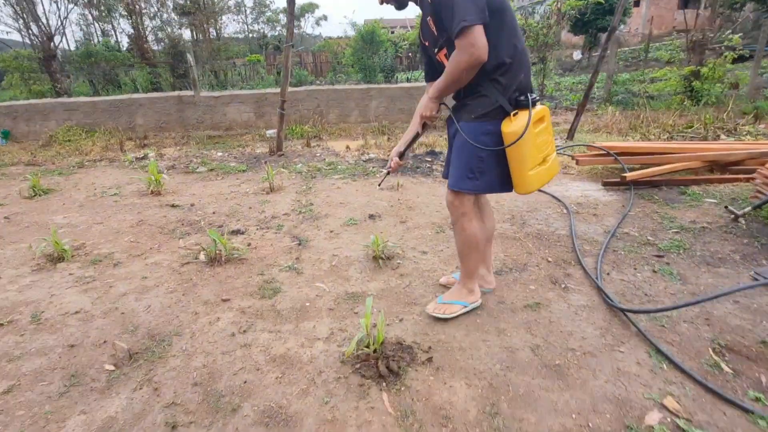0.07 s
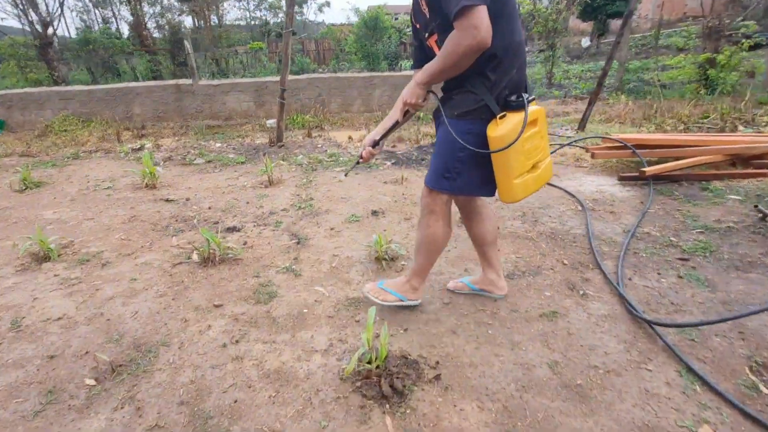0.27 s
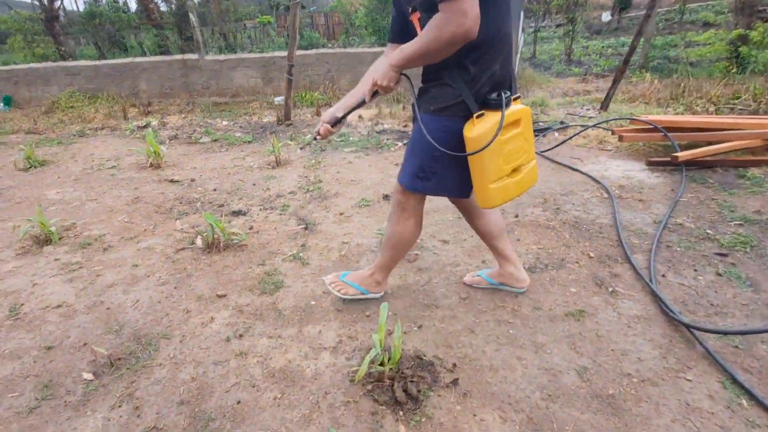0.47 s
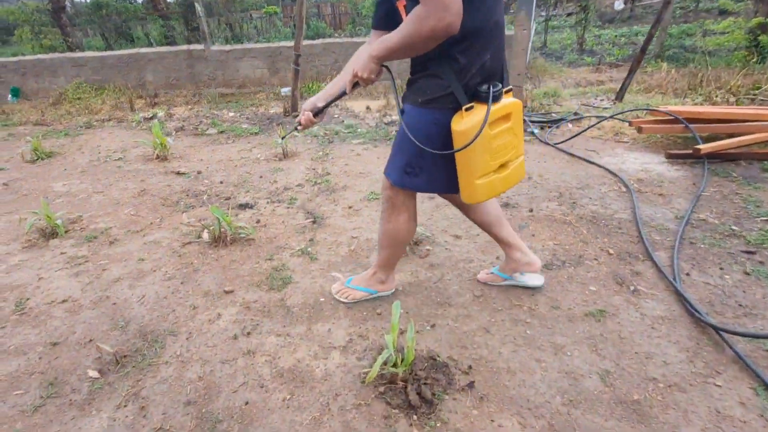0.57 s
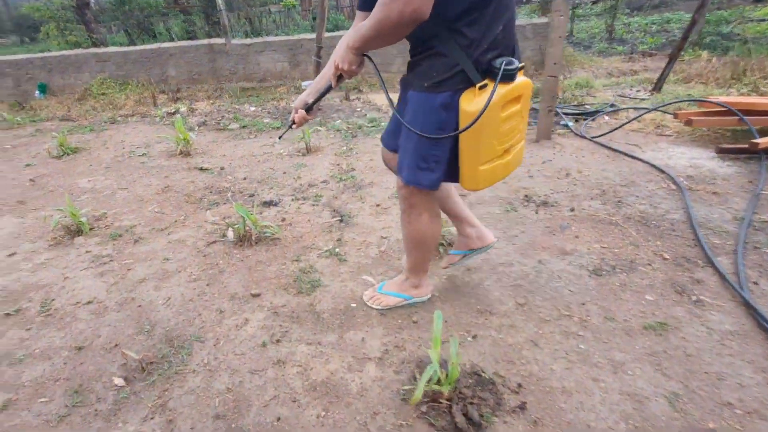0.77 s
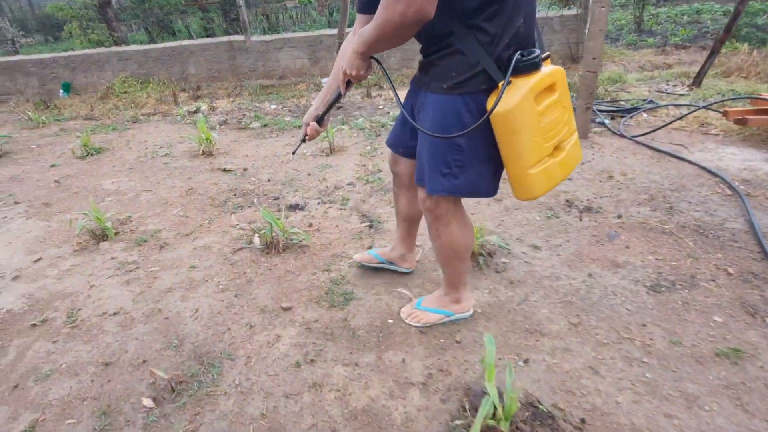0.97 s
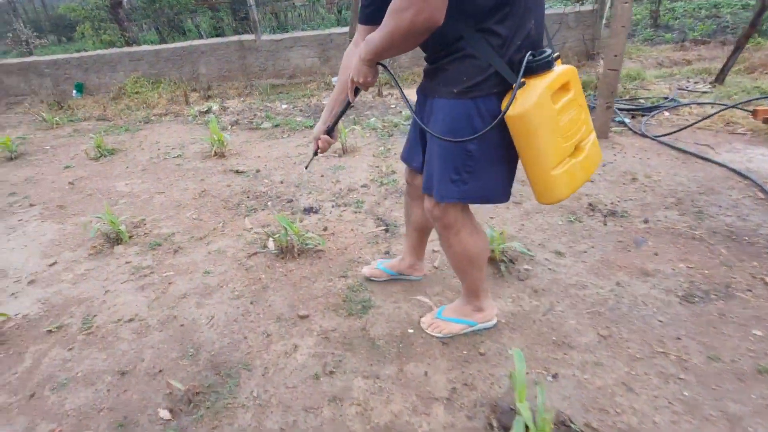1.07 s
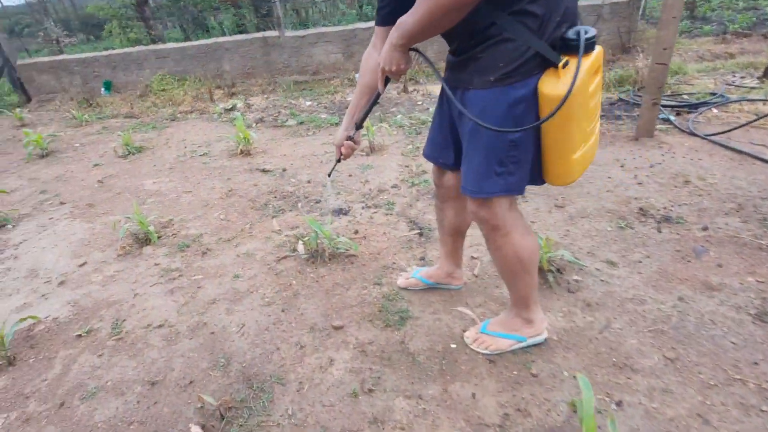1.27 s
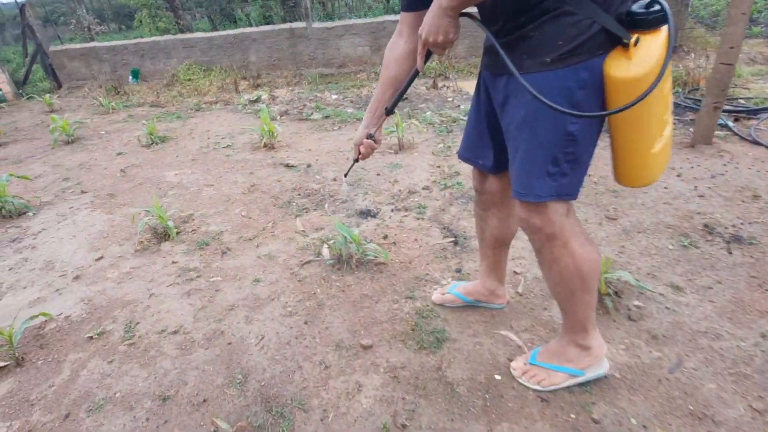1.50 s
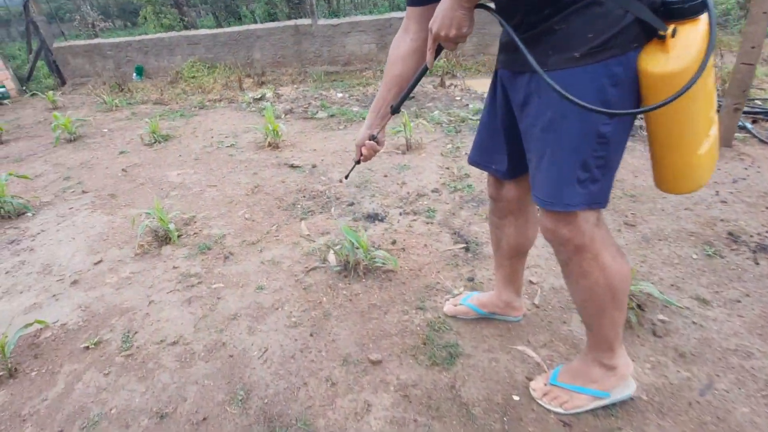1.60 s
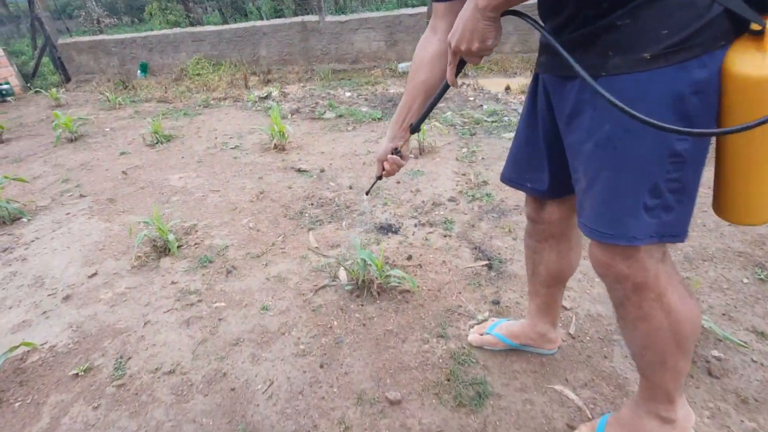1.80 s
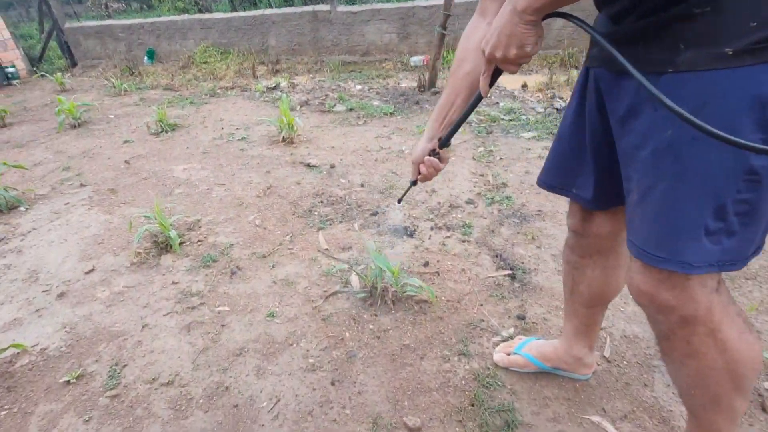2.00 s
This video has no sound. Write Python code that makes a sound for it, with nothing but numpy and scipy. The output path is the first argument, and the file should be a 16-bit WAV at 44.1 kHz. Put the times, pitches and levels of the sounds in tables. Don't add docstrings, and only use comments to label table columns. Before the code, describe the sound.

Pressure sprayer hisses fine mist onto plants in two squeezes, after sandals crunch over gritty soil

```python
import sys
import numpy as np
from scipy import signal
from scipy.fft import rfft, irfft, next_fast_len
from scipy.io import wavfile
from scipy.ndimage import uniform_filter1d, map_coordinates

SR = 44100
rng = np.random.default_rng(int(sys.argv[2]) if len(sys.argv) > 2 else 0)


def transcribe(u):
    v = np.clip(np.atleast_2d(u).T, -1, 1)
    q = np.round(v * 32767).astype(np.int16)
    wavfile.write(sys.argv[1], SR, q)


def ratio_of_db(decibels):
    return 10 ** (np.asarray(decibels, float) / 20)


N = 90404


def unit(x):
    return x / np.sqrt(np.mean(x ** 2) + 1e-20)


def along(points, hz):
    f, v = np.transpose(points)
    return np.interp(np.log(hz + 1), np.log(f + 1), v)


def wobble(rate):
    knots = rng.standard_normal(int(N * rate / SR) + 4)
    return map_coordinates(knots, [np.arange(N) * rate / SR])


def filtered(x, response):
    m = next_fast_len(N + 8192)
    return irfft(rfft(x, m) * response(np.fft.rfftfreq(m, 1 / SR)), m)[..., :N]


def spread(pair, spectrum, alike):
    def mid_side(hz):
        turn = np.arccos(np.clip(along(alike, hz), -1, 1)) / 2
        return ratio_of_db(along(spectrum, hz)) * [np.cos(turn), np.sin(turn)]

    mid, side = filtered(pair, mid_side)
    return unit(np.array([mid + side, mid - side]))


def patchy(depth_db):
    z = signal.stft(rng.standard_normal((2, N)), nperseg=256)[2]
    field = uniform_filter1d(rng.standard_normal(z.shape[1:]), 5, 0)
    field = uniform_filter1d(field, 10, 1)
    return signal.istft(z * ratio_of_db(depth_db * unit(field)), nperseg=256)[1][:, :N]


def impacts(per_s, spread_db, wash):
    hits = rng.random(N) < per_s / SR
    size = hits * ratio_of_db(spread_db * np.minimum(rng.exponential(size=N), 3))
    burst = signal.lfilter([1], [1, -.93], size)
    return unit(unit(burst) + wash) * patchy(depth_db=1.5)


def leftward(pair, lead_s):
    return filtered(pair, lambda hz: np.exp(1j * np.pi * hz * lead_s * np.array([[1], [-1]])))


def countryside():
    # pitch_hz [Hz], level_db [dB per Hz]
    air_colour = [(150, -7), (220, -16.5), (600, -4), (1000, -21.5), (1600, -4), (4000, -3.5), (7500, -7),
                  (16000, -16.5)]
    # pitch_hz [Hz], level_db [dB per Hz]
    hum_colour = [(33, -50), (45, -15), (55, 0.5), (115, -0.5), (200, -14.5), (300, -6.5), (400, -6.5)]
    # pitch_hz [Hz], left_right_likeness [0 to 1]
    far_width = [(60, 0.83), (1000, 0.22), (8000, 0.054)]
    # start_s [s], level_db [dB]
    breeze = [(0, 1.5), (.1, -1.5), (.33, 1.5), (.4, -1.5), (.49, -1.5), (.52, 2), (1.6, -1.5), (1.72, 1),
              (2.05, 4)]
    air_db, hum_db = -61.5, -70
    gust_db = np.interp(np.arange(N) / SR, *np.transpose(breeze)) + 0.31 * wobble(8.7)
    air = ratio_of_db(air_db + gust_db) * spread(patchy(depth_db=3.5), air_colour, far_width)
    hum = spread(patchy(depth_db=2), hum_colour + [(500, -61)], far_width)
    return air + ratio_of_db(hum_db + 0.66 * wobble(7.1)) * hum


def birds():
    # start_s [s], length_s [s], from_hz [Hz], to_hz [Hz], level_db [dB]
    chirps = [(.405, .055, 6950, 7100, -70), (.415, .04, 7000, 7800, -65), (.43, .035, 7150, 7950, -62),
              (.448, .04, 7350, 7950, -62), (.495, .03, 7600, 7700, -73), (.620, .012, 5450, 5100, -65),
              (.618, .035, 4950, 4200, -72), (.645, .026, 4250, 3900, -66), (.62, .035, 6650, 6700, -70),
              (.632, .025, 7200, 7550, -71), (.66, .014, 7300, 7700, -70)]
    echo_db, echo_t60 = -4, 0.21
    out = np.zeros(N + SR)
    waver = 1 + .017 * wobble(400)
    for s, d, from_hz, to_hz, db in chirps:
        start = round(s * SR)
        u = np.arange(round(d * SR)) / (d * SR)
        hz = (from_hz + (to_hz - from_hz) * u ** 0.83) * waver[start:][:len(u)]
        whistle = np.sin(2 * np.pi * np.cumsum(hz) / SR)
        out[start:][:len(u)] += ratio_of_db(db + 5) * np.sin(np.pi * u) * whistle
    tail = rng.standard_normal((2, SR // 5)) * ratio_of_db(-60 * np.arange(SR // 5) / SR / echo_t60)
    echo = signal.fftconvolve(out[None], tail / np.linalg.norm(tail[0]), axes=1)[:, :N]
    flicker_db = 3.5 * np.array([wobble(250), wobble(250)])
    return out[:N] * ratio_of_db(flicker_db) + ratio_of_db(echo_db) * echo


def thuds():
    # start_s [s], length_s [s], level_db [dB], pitch_hz [Hz]
    footfalls = [
        (.06, .08, -62, 390),
        (.697, .025, -61, 400),
        (1.05, .1, -67, 260),
        (1.197, .025, -57, 330),
        (1.305, .03, -55, 330),
        (1.335, .025, -55, 500),
        (1.762, .03, -54, 380),
        (1.79, .26, -58, 330),
    ]
    t, out = np.arange(N) / SR, 0
    for s, d, db, pitch_hz in footfalls:
        push = np.interp(t, [s, s + 0.41 * d, s + d], [0, 1, 0])
        band = filtered(rng.standard_normal(N),
                        lambda hz: np.exp(-(np.log((hz + 1) / pitch_hz) / 0.36) ** 2))
        out = out + ratio_of_db(db) * push * unit(band)
    return out


def sandals():
    # start_s [s], length_s [s], level_db [dB], grind_hz [Hz]
    scuffs = [(0.07, 0.08, -72, 4500), (0.094, 0.039, -51, 5500), (0.1, 0.046, -68, 2010),
              (0.189, 0.067, -55.5, 5440), (0.284, 0.02, -59, 3500), (0.507, 0.054, -54, 2280),
              (0.569, 0.077, -54.5, 1840), (0.703, 0.26, -58.5, 4470), (0.805, 0.038, -52.5, 1600),
              (0.826, 0.039, -49.5, 1560), (0.885, 0.13, -55, 1390), (1.046, 0.21, -54.5, 2000)]
    # pitch_hz [Hz], level_db [dB per Hz]
    grit_colour = [(200, -43), (700, -6), (1800, -2.5), (3500, -7.5), (7000, -6), (16000, -20)]
    # pitch_hz [Hz], left_right_likeness [0 to 1]
    underfoot = [(300, 0.35), (1500, 0.16), (5000, 0.13), (15000, 0.062)]
    rise = .2
    grind_db, grind_octaves = 9, 0.8
    t, out = np.arange(N) / SR, 0
    grit = spread(impacts(per_s=3500, spread_db=2, wash=0.3), grit_colour, underfoot)
    grit = ratio_of_db(1.9 * wobble(59.8)) * grit
    for s, d, db, grind_hz in scuffs:
        def grind(hz):
            octaves = np.log2((hz + 1) / grind_hz)
            return ratio_of_db(grind_db * (np.exp(-(octaves / grind_octaves) ** 2) - 0.84))

        press = np.interp(t, [s, s + rise * d, s + d, s + 2.28 * d], [0.035, 1.0, 0.54, 0.043])
        out = out + filtered(ratio_of_db(db) * press * grit, grind)
    return out


def ticks():
    # start_s [s], peak_db [dB], pitch_hz [Hz], snap_db [dB of the bright snap over the ring]
    cracks = [(0.091, -42, 2800, -10), (0.108, -47, 2160, -14), (0.131, -45, 2150, -22),
              (0.201, -46, 2500, -14), (0.267, -44, 2600, -12), (0.288, -46, 2200, -11),
              (0.293, -47, 2000, -8), (0.307, -48, 1300, -16), (0.336, -51, 1300, -16),
              (0.381, -53, 2000, -14), (0.388, -54, 1700, -18), (0.437, -52, 1400, -14),
              (0.497, -48, 5200, -10), (0.510, -49, 2220, -18), (0.517, -45, 2360, -16),
              (0.526, -46, 2000, -14), (0.533, -47, 2800, -14), (0.559, -47, 1500, -14),
              (0.589, -39.5, 1710, -12), (0.595, -47, 2000, -12), (0.699, -39.5, 1450, -16),
              (0.737, -44, 1380, -8), (0.77, -39, 2050, -13.5), (0.775, -48, 1700, -18),
              (0.802, -39, 1400, -16), (0.826, -38.5, 1000, -8), (0.832, -41, 1320, -20),
              (0.836, -40, 1590, -20), (0.86, -41, 1730, -12), (0.948, -43, 2130, -14),
              (0.955, -49, 2000, -18), (1.0005, -38.5, 1880, -22), (1.007, -49, 1300, -22),
              (1.012, -50, 1200, -22), (1.055, -46, 1200, -12), (1.059, -43, 2100, -14),
              (1.078, -41, 2200, -13), (1.099, -45, 1500, -20), (1.136, -43, 1540, -20),
              (1.141, -40, 1550, -20), (1.2, -33, 1700, -24), (1.607, -38, 1400, -16),
              (1.6375, -45, 2800, -12), (1.6415, -38, 1600, -14), (1.6665, -47, 1200, -20),
              (1.682, -47, 1000, -16), (1.7095, -42, 3000, -6)]
    ring_t60, snap_t60, spike_s, late_s = 0.0036, 0.0014, 50e-6, 0.0015
    all_db, snap_up_db, spike_db = 1, 4.5, 11
    rebound_s, rebound = .0008, 0.45
    low_hz, top_hz = 350, 9000
    out, t = np.zeros((2, N + SR)), np.arange(SR // 40) / SR
    for s, db, hz, snap_db in cracks:
        noise = rng.standard_normal(len(t)) + .5 * rng.standard_normal((2, len(t)))
        snap = ratio_of_db(snap_up_db + snap_db - 60 * t / snap_t60) * noise
        spike = ratio_of_db(spike_db + snap_db / 2) * np.exp(-t / spike_s)
        ring = ratio_of_db(-60 * t / ring_t60) * np.cos(2 * np.pi * hz * t - .6)
        crack = snap + spike + ring
        again = np.roll(crack, round(rebound_s * SR * rng.uniform(0.57, 1.3)), axis=1)
        out[:, round((s + late_s) * SR):][:, :len(t)] += ratio_of_db(db + all_db) * (crack + rebound * again)

    def light(hz):
        return (1j * hz / (low_hz + 1j * hz)) ** 2 / (1 + 1j * hz / top_hz)

    return filtered(out[:, :N], light)


def drips():
    # start_s [s], peak_db [dB], pitch_hz [Hz], t60_s [s]
    leaf_rings = [
        (1.609, -44, 600, .014),
        (1.648, -46, 1050, .012),
        (1.657, -41, 2050, .012),
        (1.668, -48, 1900, .012),
        (1.680, -50, 2100, .012),
        (1.688, -50, 2100, .016),
        (1.715, -56, 1600, .01),
        (1.632, -46, 1700, .01),
    ]
    out, t = np.zeros(N + SR), np.arange(SR // 40) / SR
    soft_edge = 1 - np.exp(-t / .0012)
    for s, db, hz, t60 in leaf_rings:
        ring = ratio_of_db(db + 6 - 60 * t / t60) * np.sin(2 * np.pi * hz * t)
        out[round(s * SR):][:len(t)] += soft_edge * ring
    return out[:N]


def hollow(x):
    # start_s [s], high_share [0 low ring, 1 high ring]
    slide = [(1.15, 0.21), (1.32, 1), (1.42, .2), (1.48, 0), (1.75, 0.2), (1.85, 0.13), (1.95, 1),
             (2.05, 0.43)]
    ring_db, width = 4.5, 0.23

    def ringing(ring_hz):
        return filtered(x, lambda hz: ratio_of_db(ring_db * np.exp(-(np.log((hz + 1) / ring_hz) / width) ** 2)))

    high = np.clip(np.interp(np.arange(N) / SR, *np.transpose(slide)), 0, 1)
    return (1 - high) * ringing(1630) + high * ringing(2170)


def sprayer():
    # start_s [s], hiss_db [dB], fine_db [dB patter over the hiss], heavy_db [dB drops over it]
    pulls = [
        [(1.05, -71, 10, 2), (1.06, -61.5, 10.5, -6), (1.075, -53.5, 6.5, -11), (1.1, -60, -5, -7),
         (1.125, -55, -7, -5), (1.13, -80, 0, 0)],
        [(1.11, -66, -2, -2), (1.138, -47.5, -0.5, -9.5), (1.205, -42, -3.5, -2.5), (1.3, -42, 0.5, 0.5),
         (1.4, -40.5, 3.5, -3.5), (1.5, -44, 1.5, 0), (1.565, -46, 3, -3), (1.605, -56.5, 8, 0.5),
         (1.715, -85, 22, 16.5)],
        [(1.732, -81, -6, 9), (1.743, -49, 3, -12), (1.775, -44.5, 6, 1.5), (1.85, -40.5, 6.5, -1.5),
         (1.95, -37.5, 6, -6), (2.05, -37, 4.5, -4.5)],
    ]
    # pitch_hz [Hz], level_db [dB per Hz]
    jet_colour = [(1500, -17), (4000, -33), (8000, -6), (12000, 0), (16000, -1)]
    # pitch_hz [Hz], level_db [dB per Hz]
    patter_colour = [(500, -45), (1200, -8), (1900, -3), (2600, -2.5), (4500, -2), (6000, 0.5),
                     (8300, -5.5), (16000, -11)]
    # pitch_hz [Hz], level_db [dB per Hz]
    heavy_colour = [(150, -33), (300, -18), (450, -17), (620, -2), (1100, 0), (1900, 1), (2600, -10.5),
                    (5000, -12)]
    # pitch_hz [Hz], left_right_likeness [0 to 1]
    near_width = [(300, .85), (1400, .8), (3000, .6), (5500, .6), (7000, .4), (15000, .5)]
    leads_s = [60e-6, 40e-6, 2e-6]
    sizzles_db, sizzle_hz = [-3, 3.5, -2.5], 8850
    t, out = np.arange(N) / SR, 0
    jet = spread(patchy(depth_db=-0.5), jet_colour, near_width)
    patter = hollow(spread(impacts(per_s=9800, spread_db=-0.5, wash=3.1), patter_colour, near_width))
    heavy = spread(impacts(per_s=1500, spread_db=4, wash=1.9), heavy_colour, near_width)
    hiss_flutter, fine_flutter, heavy_flutter = .4 * wobble(30), .6 * wobble(40), wobble(40)
    for pull, lead_s, sizzle_db in zip(pulls, leads_s, sizzles_db):
        s, hiss_db, fine_db, heavy_db = np.transpose(pull)
        sizzling = filtered(patter, lambda hz: ratio_of_db(sizzle_db * np.exp(-(hz / sizzle_hz - 1) ** 2 / 0.071)))
        fine = ratio_of_db(np.interp(t, s, fine_db) + fine_flutter) * sizzling
        drops = ratio_of_db(np.interp(t, s, heavy_db) + heavy_flutter) * heavy
        level = ratio_of_db(np.interp(t, s, hiss_db, -120, -120) + hiss_flutter)
        out = out + leftward(level * (jet + fine + drops), lead_s)
    return out


def scene():
    # pitch_hz [Hz], left_over_right_db [dB]
    lean = [(300, 2.6), (1500, -.6), (3500, 3.2), (5500, -1), (7500, 4), (8900, 1), (10500, 4.5),
            (15500, -2)]
    ground_lead_s = 290e-6
    feet = leftward(sandals() + thuds(), ground_lead_s) + leftward(ticks() + drips(), 60e-6)
    background = birds() + leftward(countryside(), ground_lead_s)
    return filtered(sprayer() + feet + background,
                    lambda hz: ratio_of_db(np.array([[.5], [-.5]]) * along(lean, hz)))


def low_pass(x):
    return signal.sosfilt(signal.butter(12, 15880, fs=SR, output="sos"), x)


def record(dry):
    # pitch_hz [Hz], level_db [dB]
    mic = [(7000, 1.5), (8300, 3.5), (9200, -5), (9900, -2.5), (11500, 3), (13000, 5)]
    top_hz = 15870
    mix = filtered(dry, lambda hz: ratio_of_db(along(mic, hz)) * (hz < top_hz))
    return low_pass(mix)


dry = scene()
out = record(dry)
transcribe(out)
```